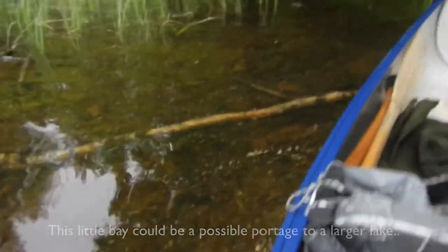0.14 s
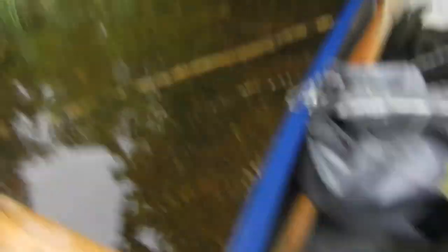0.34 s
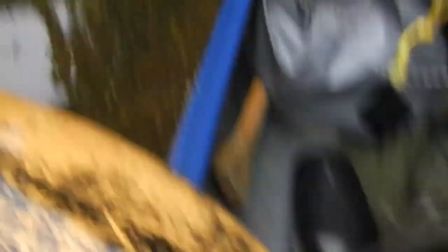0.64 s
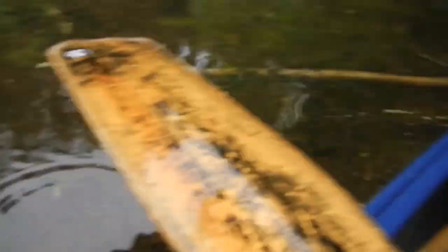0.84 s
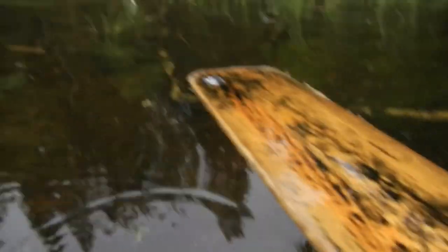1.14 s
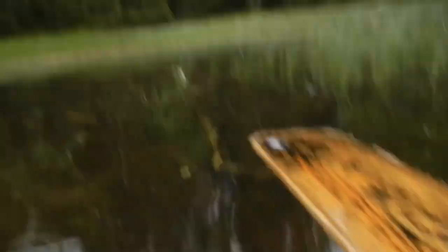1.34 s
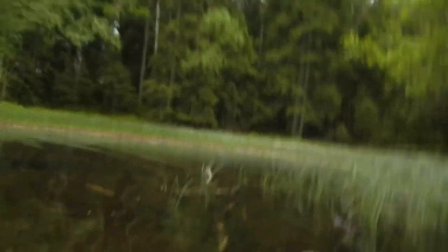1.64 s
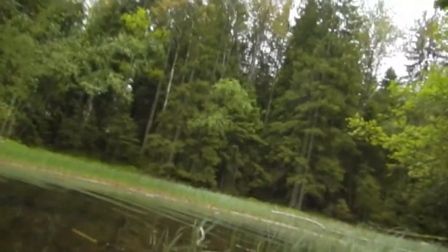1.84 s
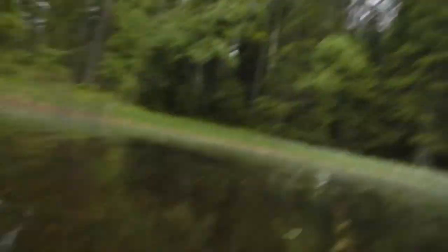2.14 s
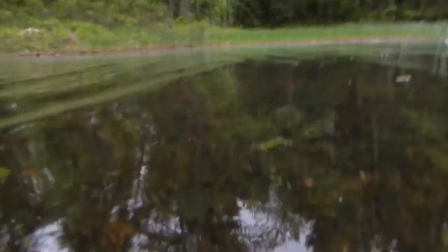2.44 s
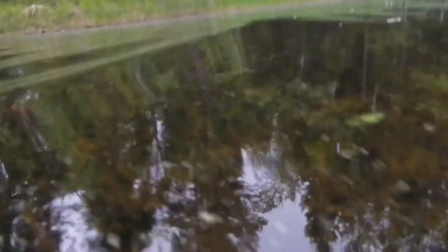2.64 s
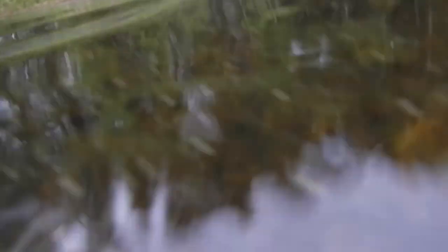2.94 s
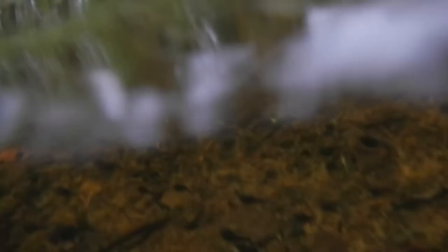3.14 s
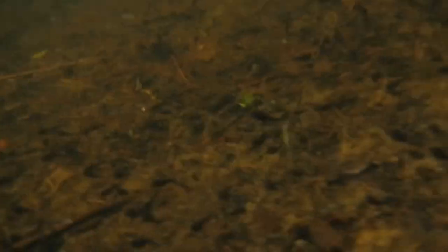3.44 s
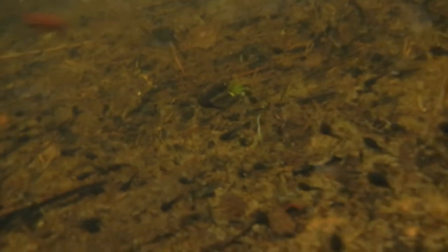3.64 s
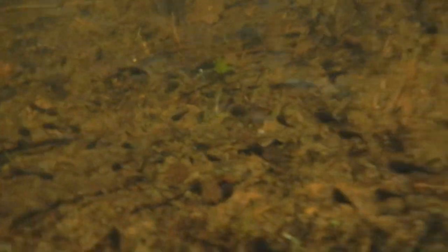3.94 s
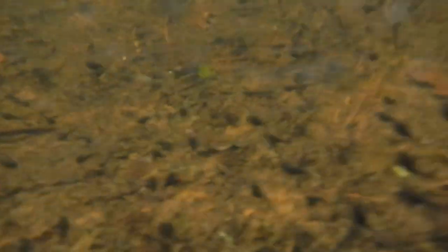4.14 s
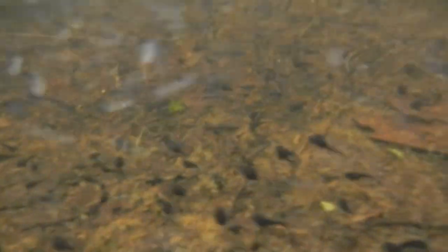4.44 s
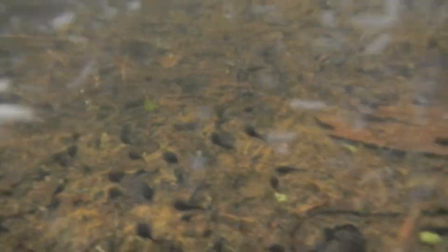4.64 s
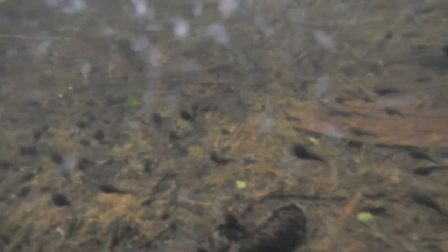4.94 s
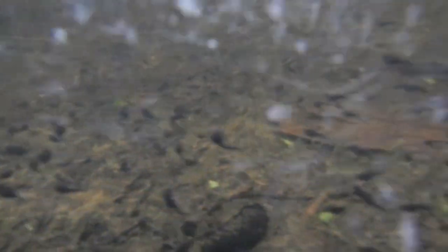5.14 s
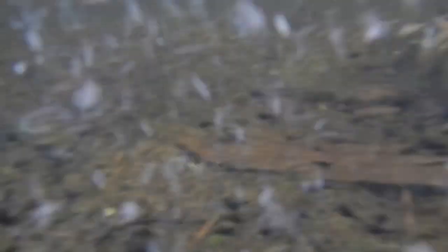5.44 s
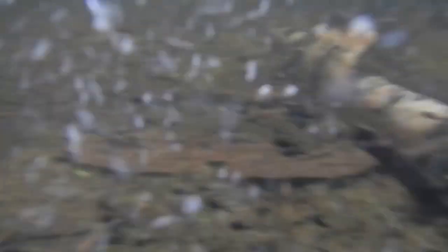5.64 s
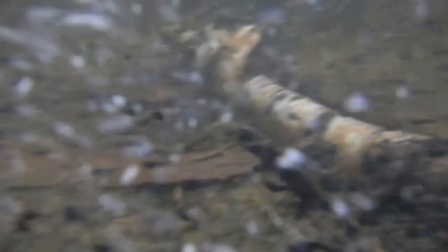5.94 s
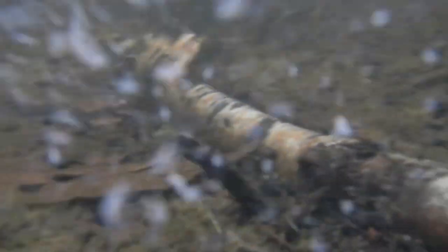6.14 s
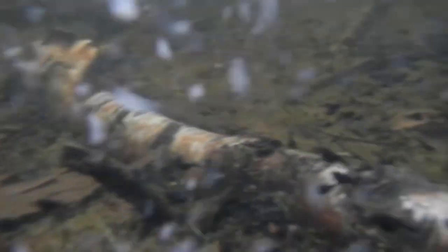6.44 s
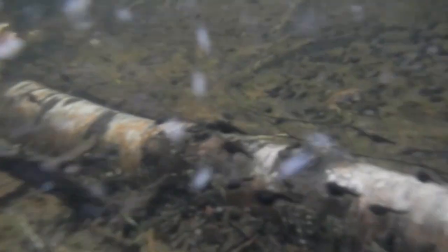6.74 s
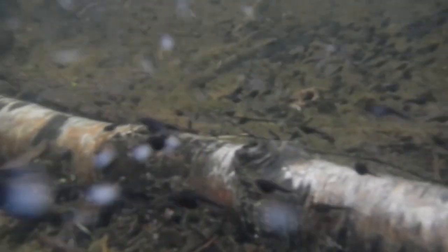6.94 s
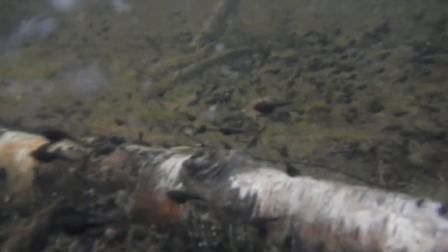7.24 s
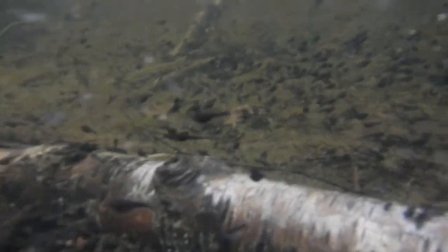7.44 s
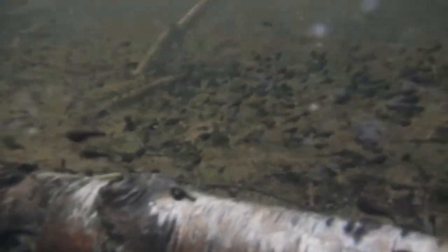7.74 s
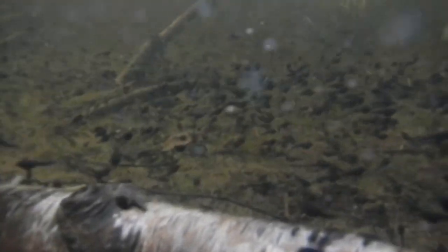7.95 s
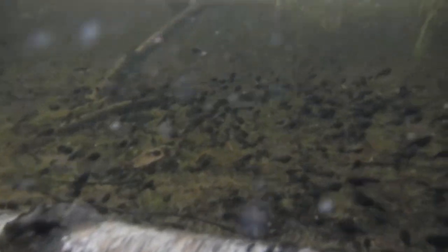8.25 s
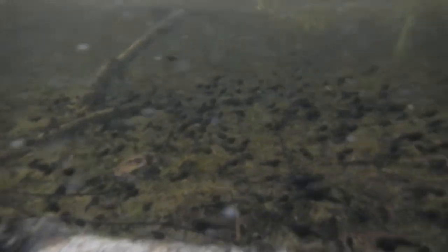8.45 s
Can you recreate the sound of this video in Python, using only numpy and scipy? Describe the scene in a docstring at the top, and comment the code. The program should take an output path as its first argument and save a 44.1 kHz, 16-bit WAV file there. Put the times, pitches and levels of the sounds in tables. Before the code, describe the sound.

Nylon sleeve swishes and gear knocks in a canoe, drops tick, then water closes over the microphones with glugs, pops and low gurgling rumble.

```python
"""Air trapped in the two microphone ports of a waterproof camera glugs, pops and rings under water.
Place: the side of a canoe on a shallow lake; the sources touch the housing or lie close to it.
First, in air, a nylon sleeve swishes, snaps and taps, gear knocks, the grip creaks and drops tick.
Then the surface closes over the ports, and resonant flow noise, free bubbles and a low rumble follow.
Sleeve and water are shaped noise; pockets, bubbles and drops are decaying sines; bodies are filters."""
import sys
import numpy as np
from scipy import signal
from scipy.fft import rfft, irfft, next_fast_len
from scipy.io import wavfile
from scipy.ndimage import uniform_filter1d, map_coordinates

SR = 44100
rng = np.random.default_rng(int(sys.argv[2]) if len(sys.argv) > 2 else 0)


def wav_record(signal):
    """Record a signal, one row per channel, as 16-bit PCM in the file named by sys.argv[1]."""
    frames = np.transpose(np.atleast_2d(signal))
    bounded = np.clip(frames, -1, 1)
    # unit amplitude maps onto the largest positive 16-bit level
    quanta = np.round(bounded * 32767).astype(np.int16)
    wavfile.write(sys.argv[1], SR, quanta)


N = 379701


def amp(db):
    """Linear gain of a level in dB."""
    return 10 ** (np.asarray(db) / 20)


def unit(x):
    """Scaled to rms 1."""
    return x / np.sqrt(np.mean(x ** 2) + 1e-20)


def peak(x):
    """Scaled to peak 1."""
    return x / (np.abs(x).max() + 1e-20)


def along(points, hz):
    """(Hz, value) points interpolated on a log frequency axis."""
    f, v = np.transpose(points)
    return np.interp(np.log(hz + 1), np.log(f + 1), v)


def clock():
    """The time of every sample in s."""
    return np.arange(N) / SR


def curves(rows):
    """One value per sample for each column after the time."""
    s, *cols = np.transpose(rows)
    return [np.interp(clock(), s, c) for c in cols]


def wobble(rate):
    """A smooth random curve with rate knots a second."""
    knots = rng.standard_normal(int(N * rate / SR) + 4)
    return map_coordinates(knots, [np.arange(N) * rate / SR])


def impulse(spectrum, size=4096):
    """The causal, minimum-phase response that has this spectrum."""
    cepstrum = irfft(np.log(amp(along(spectrum, np.fft.rfftfreq(size, 1 / SR)))))
    # folding the cepstrum forward puts all the energy after the hit
    cepstrum[1:size // 2] *= 2
    cepstrum[size // 2 + 1:] = 0
    return irfft(np.exp(rfft(cepstrum)))


def colour(x, spectrum):
    """x sounded through a body with this spectrum."""
    return signal.fftconvolve(np.atleast_2d(x), impulse(spectrum)[None], axes=1)[:, :x.shape[-1]]


def lowpass(x, order, hz):
    """x with its treble rolled off above hz."""
    return signal.sosfilt(signal.butter(order, hz, fs=SR, output="sos"), x)


def pair(alike, size=N):
    """White stereo noise whose channels share a part."""
    share = np.clip(alike, 0, 1)
    common = np.sqrt(share) * rng.standard_normal(size)
    return common + np.sqrt(1 - share) * rng.standard_normal((2, size))


def place(pan_db):
    """Left and right gains of constant power; positive leans left."""
    g = amp(np.array([pan_db, -pan_db]).reshape(2, -1) / 2)
    return g / np.sqrt(np.mean(g ** 2, axis=0))


def add(track, s, sound):
    """Mix a sound in at time s."""
    i = int(np.clip(round(s * SR), 0, N - 1))
    track[:, i:i + sound.shape[-1]] += sound[..., :N - i]


def swell(s, rise, fall):
    """A smooth Gaussian movement that peaks at 1 at time s."""
    t = clock() - s
    return np.exp(-.5 * np.minimum((t / np.where(t < 0, rise, fall)) ** 2, 100))


def swells(rows, rest):
    """Gain of (s, rise s, fall s, dB) movements, added in power to a resting gain."""
    power = sum((amp(db) * swell(s, rise, fall)) ** 2 for s, rise, fall, db in rows)
    return np.sqrt(rest ** 2 + power)


def ring(t, hz, cycles, rise, glide):
    """A resonance swells in rise cycles, dies by 1/e in cycles, and creeps up in pitch when glide > 0."""
    turns = hz * t
    phase = turns * (1 + glide * (1 - np.exp(-turns / 10)))
    envelope = np.exp(-turns / cycles) * (1 - np.exp(-(turns / rise) ** 2))
    return peak(np.sin(2 * np.pi * phase) * envelope)


def gurgle(rate, spread_db, smooth_db):
    """Countless tiny bubbles, as clustered random impulses, on a bed of turbulence."""
    births = rng.random(N) < rate / SR * amp(4 * wobble(14))
    sizes = amp(spread_db * np.minimum(rng.exponential(size=N), 3)) * rng.choice([-1, 1], N)
    return unit(births * sizes) + amp(smooth_db) * rng.standard_normal(N)


def in_air():
    """1 until the water covers the ports, then 0."""
    return np.interp(clock(), [3.11, 3.15], [1, 0])


# pockets of air break away from the ports, before port tuning and trims:
# time_s, glug_level_db, glug_pitch_hz, ring_cycles, left_over_right_db, pop_level_db, snap_level_db
ESCAPING_POCKETS = [(3.1316, -2.5, 280, 1.9, -19.5, 2.5, -5.5), (3.243, -8.5, 304, 0.69, -1.5, -4.5, -9),
                    (3.3331, -17.5, 265, 1.6, -6, -31, -42), (3.5086, -15.5, 251, 1.13, 6, -18, -38),
                    (3.695, -9.5, 206, 1.1, 17, -20.5, -30), (3.7802, -12.5, 236, 1.37, 14.5, -15, -26),
                    (3.8733, -10, 227, 1.7, 11, -13, -24.5), (3.889, -11.5, 209, 2.5, 41, -40, -57.5),
                    (3.937, -10.5, 240, 0.9, 12, -10, -28.5), (4.001, -11.5, 280, 1.3, -18, -16.5, -37.5),
                    (4.031, -8, 233, 1.55, 10, -7.5, -28), (4.0905, -13.5, 225, 1.65, 12.5, -9, -29),
                    (4.157, -13.5, 234, 1.4, 13.5, -8, -23.5), (4.251, -9.5, 234, 2.3, 8, -2, -17.5),
                    (4.332, -10, 202, 1.7, 26, -38, -54), (4.3732, -10, 233, 2.4, 13, -6, -22),
                    (4.381, -8.5, 189, 1.4, 22.5, -3.5, -14.5), (4.599, -7, 201.1, 0.98, 6.5, -7, -18.5),
                    (4.679, -6.5, 196, 1.1, 14, -11.5, -51), (4.739, -7, 210, 1.2, 0, -7, -17.5),
                    (4.7857, -8, 194, 1.7, 2.5, -32, -44), (5.0073, -6, 212, 0.93, 11.5, -2, -25),
                    (5.431, -5.5, 258.9, 0.84, 0, -5.5, -30), (5.559, -15, 232.7, 1.455, 6, -35, -49),
                    (6.3862, -7, 201, 1.2, -7, -9, -23.5), (6.3927, -9.5, 220, 0.75, 2, -10, -41.5),
                    (6.8007, -15, 271, 2.3, -22, -5, -17), (6.8266, -16, 282, 1.5, -22, -18, -52),
                    (7.544, -4, 299, 3.17, -13, -10, -30), (8.423, -0.5, 276, 0.5, -5.5, -7, -31)]
GLUG_LAG_S = 0.00064  # the glug follows its pop
POP_HZ, POP_SCATTER = 929, 0.05  # the ports' upper resonance; log spread from pop to pop
POP_CYCLES, POP_GLIDE = 2.3, 0.028  # ring of a pop; pitch creep for each cycle of ring
POP_PAN_FOLLOWS, POP_PAN_DB = .45, -5.5  # a pop leans with its glug, plus a fixed lean


def glugs():
    """Each escaping pocket pops as it pinches off, and the air left behind glugs."""
    out = np.zeros((2, N))
    for s, db, hz, cycles, pan_db, pop_db, snap_db in ESCAPING_POCKETS:
        add(out, s + GLUG_LAG_S, glug(db, hz, cycles, pan_db))
        pop_hz = POP_HZ * np.exp(POP_SCATTER * rng.standard_normal())
        pop_pan_db = POP_PAN_FOLLOWS * pan_db + POP_PAN_DB
        add(out, s, pop(pop_db, pop_hz, POP_CYCLES, pop_pan_db, snap_db))
    return out


def glug(db, hz, cycles, pan_db):
    """The air in the ports rings a few cycles; the right port holds less and rings higher."""
    t = np.arange(SR // 8) / SR
    left = ring(t, hz * 0.863, cycles, rise=0.38, glide=0.038)
    right = ring(t, hz * 1.15, cycles * 0.62, rise=0.26, glide=0.029)
    return amp(db - 0.5) * place(pan_db) * np.array([left, right])


# the housing as a sharp snap or a rattle excites it: frequency_hz, level_db
HOUSING_SNAP = [(500, -18.5), (1300, -2.5), (1750, 7), (2400, -7), (3100, -10), (4200, -21.5), (9000, -45)]
PORT_DELAY_S, SNAP_LAG_S = 0.00029, 0.00013  # the right port rings, and gets the snap, this much later
OVERTONE_HZ, OVERTONE_DB = 1670, -7.5  # the housing's ring after a snap
SPATTER_DB, SPATTER_T60_S = -12, 0.026  # tiny bubbles torn off by a snap


def pop(db, hz, cycles, pan_db, snap_db):
    """A bursting bubble snaps and spatters through the housing, and rings each port at its own pitch."""
    click = peak(impulse(HOUSING_SNAP))
    t = np.arange(len(click)) / SR
    overtone = ring(t, OVERTONE_HZ, cycles=3.3, rise=0.23, glide=0.02)
    snap = amp(-3.0) * click + amp(OVERTONE_DB) * overtone
    snaps = np.array([snap, np.interp(t - SNAP_LAG_S, t, snap, left=0)])
    spatter = unit(colour(pair(alike=0.27, size=len(t)), HOUSING_SNAP))
    snaps += amp(SPATTER_DB - 60 * t / SPATTER_T60_S) * spatter
    glide = POP_GLIDE * cycles
    left = ring(t, hz, cycles, rise=0.73, glide=glide)
    right_t = np.maximum(t - PORT_DELAY_S, 0)
    right = ring(right_t, hz * 0.897, cycles * 0.65, rise=0.58, glide=glide)
    return place(pan_db) * (amp(db) * np.array([left, right]) + amp(snap_db - 0.5) * snaps)


# free bubbles ring close to the ports, before port tuning: time_s, level_db, pitch_hz, left_over_right_db
FREE_BUBBLES = [(3.354, -18, 1075, 6.5), (4.196, -14.5, 870, 10), (4.214, -4, 870, 6.5),
                (4.2587, -5.5, 890, 9), (4.281, -29, 1800, -3), (4.3928, -5, 984, 30.5),
                (4.412, -6, 814, 2.5), (4.5573, -8, 930, 14.5), (4.6588, -6.5, 900, 9.5),
                (4.8254, -11, 865, 2.5), (5.131, -16, 1000, 5), (5.154, -14, 850, -11),
                (5.259, -35, 1710, -2), (5.68, -9.5, 960, 12), (5.71, -11, 887, 10),
                (6.182, -12.5, 1397, 10), (7.3782, -7.5, 930, -16.5), (8.2919, -7, 1050, 2)]
PLIP_CYCLES, PLIP_CYCLES_GROW = 2.13, 1.7  # ring at POP_HZ; power by which it lengthens with pitch
PLIP_SNAP_DB = -30  # a free bubble hardly snaps


def plips():
    """A free bubble is a pop with no glug."""
    out = np.zeros((2, N))
    for s, db, hz, pan_db in FREE_BUBBLES:
        cycles = PLIP_CYCLES * (hz / POP_HZ) ** PLIP_CYCLES_GROW
        add(out, s, pop(db, hz, cycles, pan_db, db + PLIP_SNAP_DB))
    return out


# soft pushes on the ports, by the hand or by eddies, before port tuning and trim:
# time_s, level_db, pitch_hz, left_over_right_db
SOFT_PUSHES = [(0.505, -19, 121, -26), (1.956, -20.5, 114, 1), (2.101, -16.5, 170, 24),
               (2.218, -14.5, 130, 2), (2.645, -18.5, 190, -7), (2.88, -16.5, 155, -37.5),
               (7.337, -15.5, 198.4, 16), (7.52, -9.5, 170, -1.5), (7.602, -12.5, 131.4, 10),
               (7.683, -14, 140, 5.5), (7.785, -9, 111.5, 10), (8.004, -7, 263, 8), (8.402, -7.5, 125, 7)]


def thumps():
    """A soft push rings the ports low, with no pop."""
    out = np.zeros((2, N))
    for s, db, hz, pan_db in SOFT_PUSHES:
        add(out, s, glug(db, hz, cycles=1.55, pan_db=pan_db))
    return out


# wavelets slap the ports shut, each falling in pitch: time_s, peak_db, first_pitch_hz, last_pitch_hz
WAVELET_SLAPS = [(3.054, -15, 1590, 652), (3.0729, -5.5, 2050, 480), (3.0933, -7.5, 1900, 400),
                 (3.1068, -5, 1150, 203), (3.1175, -11, 1990, 478)]
SLAP_FALL_S, SLAP_RISE_S, SLAP_DECAY_S = 0.0011, 0.00039, 0.005  # the pitch's fall; the swell; the fade


def slaps():
    """Water loads the open ports, so each slap rings for a few cycles and drops in pitch, alike in both."""
    out, t = np.zeros((2, N)), np.arange(SR // 40) / SR
    shape = (1 - np.exp(-t / SLAP_RISE_S)) * np.exp(-(t / SLAP_DECAY_S) ** 2)
    for s, db, first_hz, last_hz in WAVELET_SLAPS:
        extra_turns = (first_hz - last_hz) * SLAP_FALL_S * (1 - np.exp(-t / SLAP_FALL_S))
        turns = last_hz * t + extra_turns
        add(out, s, amp(db) * peak(shape * np.sin(2 * np.pi * turns)))
    return out


# the surface closes over the housing: time_s, rush_level_db
PLUNGE_RUSH = [(2.8, -86), (2.89, -36), (3.02, -31), (3.055, -21), (3.125, -18), (3.145, -25.5),
               (3.18, -50), (3.2, -80)]
# broken water over the whole housing: frequency_hz, level_db
WASH_SPECTRUM = [(25, 1.5), (100, 7), (300, 2.5), (650, 5), (1100, 2.5), (1700, -10), (3000, -21),
                 (14000, -66.5)]


def plunge():
    """Water churns and crackles over the housing as it goes down."""
    rush_db, = curves(PLUNGE_RUSH)
    spatter = gurgle(rate=1800, spread_db=6.0, smooth_db=-6) + amp(-8.5) * pair(alike=0)
    return amp(rush_db) * unit(colour(spatter, WASH_SPECTRUM))


# shoves of the housing; some build up and stop short, others start abruptly and fade:
# peak_time_s, rise_s, fall_s (Gaussian widths), gurgle_level_db, churn_level_db
HOUSING_SHOVES = [(3.265, .012, 0.024, -37.5, -33), (4.204, 0.011, .022, -33, -35),
                  (4.47, 0.023, 0.041, -32.5, -45), (5.391, 0.068, 0.029, -30, -37.5),
                  (5.712, .005, 0.024, -25.5, -34), (5.863, 0.0033, 0.062, -30.5, -29),
                  (6.68, 0.061, 0.11, -31.5, -41), (7.495, 0.044, 0.035, -27.5, -26.5),
                  (8.41, 0.44, 0.016, -24.5, -43), (8.415, .016, 0.011, -34, -22.5)]
TREBLE_HZ = 1390  # where the treble of moving water begins


def churn():
    """A shove breaks the water over the whole housing in a broad, grainy swish."""
    level = swells([(s, rise, fall, db) for s, rise, fall, _, db in HOUSING_SHOVES], 0)
    grains = np.array([gurgle(rate=600, spread_db=5.5, smooth_db=-13) for _ in range(3)])
    swish = colour(grains[:2] + grains[2], WASH_SPECTRUM)
    return level * unit(lowpass(swish, 1, TREBLE_HZ))


# steady water moving past the ports, before the gurgle gain: time_s, level_db
STEADY_FLOW = [(3.18, -38), (3.75, -46), (4.08, -40), (4.42, -41), (4.69, -33), (5.11, -38.5),
               (5.76, -40.5), (6.24, -34.5), (6.87, -38), (7.01, -36.5), (7.32, -30), (7.62, -33.5),
               (8.0, -31), (8.27, -33.5), (8.45, -35), (8.6, -36)]
GURGLE_DB = 4.5  # gain over the steady flow
STIR_DB, STIR_RISE_S, STIR_FALL_S = -26.5, 0.02, 0.006  # swirl around each escaping pocket, re its glug


def flow_level():
    """Level in dB of the water's motion: steady flow, shoves and swirls add in power."""
    steady_db, = curves(STEADY_FLOW)
    shoves = [row[:-1] for row in HOUSING_SHOVES]
    swirls = [(s, STIR_RISE_S, STIR_FALL_S, db + STIR_DB) for s, db, *_ in ESCAPING_POCKETS]
    return 20 * np.log10(swells(shoves + swirls, amp(steady_db + GURGLE_DB)))


# the air trapped in the ports: time_s, left_over_right_db, pitch_factor
TRAPPED_AIR = [(3.2, -4, 1.12), (3.6, -0.5, 0.99), (6.4, 3.5, 1), (7.3, -2, 1.02), (7.7, 5.5, 1.033)]
# resonances of the flooded left port: frequency_hz, level_db
LEFT_RESONANCES = [(50, -17), (130, 2), (200, 6), (320, -9.5), (550, -20), (780, -8), (900, 1), (1060, 2),
                   (1300, -19.5), (1700, -15), (2050, -33), (2600, -40), (3100, -31), (4200, -61),
                   (8000, -80)]
# resonances of the flooded right port: frequency_hz, level_db
RIGHT_RESONANCES = [(55, -15.5), (180, -3), (310, 1.5), (580, -7), (880, 3), (1110, -7.5), (1400, -20),
                    (1800, -25), (2550, -43), (3200, -36), (4400, -56), (9000, -86)]
CROSS_FLOW_DB = -6.5  # water crossing the housing presses one port and draws on the other
WANDER, WANDER_RATE = .02, 14  # share by which the ports' pitch wanders; knots per s
TREBLE_DB, TREBLE_GROWS = 3, 0.4  # treble gain in fast flow; dB gained per dB of flow


def flooded_ports(flow_db, speed_db):
    """Each port colours the turbulence with its own resonances; slow water leaves the upper ones quiet."""
    pan_db, tuning = curves(TRAPPED_AIR)
    stir = np.array([gurgle(rate=300, spread_db=2.5, smooth_db=-9.5) for _ in range(3)])
    drives = stir[:2] + amp(CROSS_FLOW_DB) * np.array([stir[2], -stir[2]])
    bodies = (LEFT_RESONANCES, RIGHT_RESONANCES)
    ports = [unit(colour(drive, body))[0] for drive, body in zip(drives, bodies)]
    # the resonances drift as the trapped air changes in size
    drifted = []
    for port in ports:
        position = np.cumsum(tuning + WANDER * wobble(WANDER_RATE))
        drifted.append(map_coordinates(port, [position], mode="mirror"))
    drifted = np.array(drifted)
    low = signal.sosfiltfilt(signal.butter(2, TREBLE_HZ, fs=SR, output="sos"), drifted)
    sound = low + amp(TREBLE_DB + TREBLE_GROWS * speed_db) * (drifted - low)
    return amp(flow_db + 2.14 * wobble(20)) * sound * place(pan_db)


CLOUD_DB, CLOUD_S = 9, .5  # the cloud of bubbles dragged down by the plunge, and its 1/e life


def bubble_cloud(flow_db):
    """Single bubbles stand out most in slow water, and around the end of the plunge."""
    cloud_db = CLOUD_DB * np.exp(-np.abs(clock() - PLUNGE_RUSH[-1][0]) / CLOUD_S)
    return amp(0.56 * flow_db - 24.0 + cloud_db) * bubbles(count=900, hz=697, spread=.4, size_db=8)


def bubbles(count, hz, spread, size_db):
    """Free bubbles of many sizes, each a short rising note nearer to one port."""
    out, t = np.zeros((2, N)), np.arange(SR // 25) / SR
    times = rng.uniform(0, N / SR, count)
    traits = np.clip(rng.standard_normal((count, 3)), -2, 2)
    for s, (pitch, size, side) in zip(times, traits):
        note = ring(t, hz * np.exp(spread * pitch), cycles=1.9, rise=0.46, glide=0.14)
        add(out, s, amp(size_db * size) * place(7 * side) * note)
    return unit(out)


# the housing pushes water, before the rumble gain: time_s, rumble_level_db
HOUSING_SWAY = [(3.18, -29), (3.38, -59), (4.27, -36), (5.58, -42), (6.21, -32.5), (6.97, -45.5),
                (7.44, -32), (8.42, -26), (8.48, -33)]
# low noise of the pushed water: frequency_hz, level_db
RUMBLE_SPECTRUM = [(12, -1), (42, 8), (95, 3), (160, -1.5), (260, -16), (600, -67)]


def rumble():
    """The moving housing pushes water in low, unsteady noise, nearly alike in both ports."""
    rumble_db, = curves(HOUSING_SWAY)
    noise = unit(colour(amp(2.4 * wobble(22)) * pair(alike=0.9), RUMBLE_SPECTRUM))
    return amp(rumble_db + 2.5) * noise * place(1.6)


# levels when the flow is fast, before the fizz; each grows by so many dB per dB of flow
RATTLE_DB, RATTLE_GROWS = -45.5, 1.05


def rattle(speed_db, fizz_db):
    """Fast water rattles the housing itself."""
    noise = unit(colour(amp(2.4 * wobble(200)) * pair(alike=0.081), HOUSING_SNAP))
    return amp(RATTLE_DB + RATTLE_GROWS * speed_db + fizz_db) * noise * place(3.5)


# bright spray noise: frequency_hz, level_db
SPRAY_SPECTRUM = [(1500, -16.5), (3300, -4), (5000, -0.5), (9000, -2), (13300, -5.5), (14500, -22.5)]
SPRAY_DB, SPRAY_GROWS, SPRAY_BUILD_S = -61, 3.7, 0.38


def spray(speed_db, fizz_db):
    """Only a lasting flow raises spray, so its speed is averaged and then steeply expanded."""
    lasting_db = uniform_filter1d(speed_db, int(SPRAY_BUILD_S * SR))
    noise = unit(colour(amp(3.1 * wobble(330)) * pair(alike=0.073), SPRAY_SPECTRUM))
    return amp(SPRAY_DB + SPRAY_GROWS * lasting_db + fizz_db) * noise


# share of fine fizz in the flow: time_s, level_db
FIZZ_SHARE = [(3.6, -4), (4.0, 6), (5.1, -8.5), (6.2, 2), (6.95, -1.5), (8.0, 3)]
FAST_FLOW_DB = -22.5  # flow level at which the treble, rattle and spray levels hold


def underwater():
    """The flow stirs the air in each port, sheds bubbles and raises rattle and spray, over the rumble."""
    flow_db = flow_level()
    speed_db = flow_db - FAST_FLOW_DB
    fizz_db, = curves(FIZZ_SHARE)
    out = flooded_ports(flow_db, speed_db) + bubble_cloud(flow_db) + rumble()
    out += rattle(speed_db, fizz_db) + spray(speed_db, fizz_db)
    return out * (1 - in_air())


# a loose air pocket at the right port swells, then shrinks: time_s, pitch_hz, level_db
LOOSE_AIR = [(5.15, 772, -62), (5.36, 687, -40.5), (6.05, 478, -45.5), (6.7, 659, -45), (7.1, 699, -37),
             (7.52, 804, -29.5), (7.58, 810, -77)]


def loose_pocket(width_hz):
    """Soft eddies push on a loose pocket of air, whose burbling note follows its size."""
    hz, db = curves(LOOSE_AIR)
    turn = np.exp(2j * np.pi * np.cumsum(hz) / SR)
    eddies = lowpass(gurgle(rate=150, spread_db=2.5, smooth_db=-9), 2, POP_HZ)
    # shift the moving pitch to zero, resonate there, and shift back
    pole = np.exp(-np.pi * width_hz / SR)
    note = (signal.lfilter([1], [1, -pole], eddies / turn) * turn).imag
    return amp(db) * unit(note) * place(-16)


# sharp ticks of water on the housing: time_s, peak_db
WATER_TICKS = [(3.13, -16), (3.241, -32), (3.354, -50.5), (4.033, -37), (4.229, -42.5), (4.677, -41),
               (4.74, -36.5), (5.01, -38), (5.431, -37.5), (6.075, -42.5), (6.388, -38.5), (6.802, -35.5),
               (7.545, -42), (8.2914, -34), (8.424, -33)]
# a small, bright click: frequency_hz, level_db
CLICK_SPECTRUM = [(1000, -20), (5000, 2), (8000, -9.5), (15000, -19)]


def ticks():
    """Tiny bright impacts, with almost no ring."""
    out, click = np.zeros((2, N)), peak(impulse(CLICK_SPECTRUM))
    for s, db in WATER_TICKS:
        add(out, s, amp(db) * click)
    return out


# strokes of the nylon sleeve, with a few brief snaps and taps:
# peak_time_s, rise_s, fall_s (Gaussian widths), hiss_level_db, rub_level_db
SLEEVE_MOVES = [(0.16, 0.08, 0.063, -35, -38.5), (.23, 0.054, 0.048, -37, -36),
                (0.2951, 0.0018, 0.0029, -21.5, -20.5), (.325, 0.011, 0.019, -53, -35),
                (.44, 0.02, 0.04, -62, -45), (.509, 0.01, 0.0094, -35, -25), (.72, 0.046, 0.038, -38, -43),
                (0.766, 0.022, 0.027, -28.5, -32), (.853, 0.0026, 0.0046, -55, -34.5),
                (.92, 0.051, 0.021, -41, -47.5), (1.05, 0.071, 0.033, -35, -39.5),
                (1.2, 0.34, 0.47, -43, -42), (1.3, 0.017, 0.034, -32, -35), (1.55, 0.33, 0.35, -46, -44.5),
                (1.7, 0.024, 0.027, -35.5, -51.5), (1.789, 0.018, 0.018, -23.5, -34),
                (1.894, 0.0065, 0.005, -20.5, -28), (2.125, 0.065, 0.03, -46.5, -34.5),
                (2.27, 0.15, 0.14, -42.5, -40.5), (2.481, 0.062, 0.024, -32.5, -35),
                (2.61, 0.047, 0.093, -40, -45.5), (2.95, 0.25, 0.27, -43, -39.5)]
# bright hiss of the nylon: frequency_hz, level_db
HISS_SPECTRUM = [(1500, -39.5), (3000, -4), (4700, -9), (6000, -1), (7500, -4.5), (9500, -0.5),
                 (12000, -5.5), (14200, -5.5), (15500, -30.5)]
# duller rub of the cloth: frequency_hz, level_db
CLOTH_SPECTRUM = [(100, -11.5), (250, -9.5), (520, -1), (750, -10), (1300, -10.5), (2200, -5.5),
                  (5000, -20.5), (10000, -55)]
SLEEVE_REST_DB, RUB_REST_DB = -53, -50.5  # the sleeve never lies quite still
# the hand shifts its hold: peak_time_s, rise_s, fall_s (Gaussian widths), rumble_level_db
HAND_SHIFTS = [(.515, 0.015, 0.0046, -26), (2.0, 0.19, 0.35, -34), (3.12, 0.06, .035, -26)]
# low rumble of the hand on the housing: frequency_hz, level_db
HANDLING_SPECTRUM = [(15, -17), (40, 2.5), (100, -1.5), (190, -6), (350, -18), (900, -54.5)]
HOLD_DB = -49.5  # rumble of the resting hand


def sleeve():
    """Nylon strokes and a few brief snaps and taps, each a hiss over a duller rub; the hand rumbles below."""
    hiss_gain = swells([(s, rise, fall, db) for s, rise, fall, db, _ in SLEEVE_MOVES], amp(SLEEVE_REST_DB))
    rub_gain = swells([(s, rise, fall, db) for s, rise, fall, _, db in SLEEVE_MOVES], amp(RUB_REST_DB))
    weave = amp(1.5 * wobble(500) + 1.8 * wobble(40.14))
    hiss = unit(colour(weave * pair(alike=0.16), HISS_SPECTRUM))
    rub = unit(colour(weave * pair(alike=0.32), CLOTH_SPECTRUM))
    hand = unit(colour(amp(5.0 * wobble(25.02)) * pair(alike=0.35), HANDLING_SPECTRUM))
    out = hiss_gain * shaded(hiss, hz=5900) * place(2.1)
    out += rub_gain * rub
    out += swells(HAND_SHIFTS, amp(HOLD_DB)) * hand
    return out * in_air()


# the hand covers the ports: time_s, share_dulled (0 to 1)
HAND_COVER = [(1.91, 0), (1.94, 1), (2.5, 0.6), (3.0, 1)]


def shaded(x, hz):
    """A hand over the ports takes the top off the hiss."""
    cover = np.clip(curves(HAND_COVER)[0], 0, 1)
    return x + cover * (lowpass(x, 1, hz) - x)


# knocks on the hull, before the body gain and decay factors: time_s, level_db, crack_level_db, t60_s
HULL_KNOCKS = [(.196, -33, -45, .05), (0.508, -22.5, -28.5, 0.026), (0.772, -29.5, -40.5, 0.037),
               (1.137, -25, -26, 0.029), (1.358, -20, -7.5, 0.16)]
# the hull's dense ring: frequency_hz, level_db
HULL_SPECTRUM = [(40, -51), (110, 3), (260, -2.5), (450, 1), (750, -4.5), (1100, -1.5), (1600, -14.5),
                 (2400, -10.5), (4000, -15), (10000, -47)]


def knocks():
    """A crack, then the hull's dense ring, whose treble dies first and leaves a low hum."""
    out, t = np.zeros((2, N)), np.arange(SR // 3) / SR
    crack_spectrum = [(300, -9.0), (3000, 2.5), (14000, -9)]  # Hz, dB
    for s, db, crack_db, t60 in HULL_KNOCKS:
        body = unit(colour(pair(alike=0.69, size=len(t)), HULL_SPECTRUM))
        low = lowpass(body, 1, 600)
        boom = low * amp(-60 * t / (t60 * 1.37)) + (body - low) * amp(-60 * t / (t60 * 0.84))
        hum = amp(-1.5) * ring(t, hz=155.0, cycles=t60 * 38, rise=0.29, glide=0)
        hum += amp(1.0) * ring(t, hz=286.0, cycles=t60 * 30, rise=0.86, glide=0)
        crack = unit(colour(pair(alike=0.38, size=len(t)), crack_spectrum)) * amp(-60 * t / 0.0063)
        add(out, s, amp(db + 6.5) * (boom + 0.37 * hum) + amp(crack_db) * crack)
    return out


# a finger skids on the housing, before panning: pitch_hz, level_db
SKID_TONES = [(1170, -23.5), (1640, -12.5), (1850, -16)]
SKID_AT_S = 1.9122


def squeak(width):
    """One short skid of unsteady tones that swells and stops; width in s."""
    t = clock() - SKID_AT_S
    envelope = np.exp(-.5 * (t / width) ** 2)
    tones = sum(amp(db) * np.sin(2 * np.pi * hz * t + 0.91 * wobble(600)) for hz, db in SKID_TONES)
    return tones * envelope * place(11)


# the grip sticks and slips, before jitter and trims: time_s, slips_per_s, level_db
GRIP_SLIPS = [(2.0, 155, -26.5), (2.025, 165, -23), (2.04, 297, -16.5), (2.07, 170, -19),
              (2.085, 106, -11.5), (2.125, 125, -9), (2.137, 222, -8), (2.156, 205, -19.5)]
# the plastic housing at the grip: frequency_hz, level_db
GRIP_SPECTRUM = [(200, -18), (550, -6), (1000, 2.5), (1500, -9), (2000, 5), (2500, 4.5), (2900, -14.5),
                 (3700, -2), (4500, -18), (7000, -21.5), (14000, -45)]
EDGE_DB, EDGE_GROWS = -4, 2.3  # the bright edge of a slip grows faster than its body


def creak():
    """Uneven slips of the grip, each a click through the plastic housing; hard slips are brighter."""
    rate, db = curves(GRIP_SLIPS)
    count = np.floor(np.cumsum(rate * amp(1.8 * wobble(160))) / SR)
    active = (clock() > GRIP_SLIPS[0][0]) * (clock() < GRIP_SLIPS[-1][0])
    slips = np.diff(count, prepend=0) * active
    sizes = slips * amp(db + 0.67 * wobble(150))
    clicks = signal.fftconvolve(sizes, peak(impulse(GRIP_SPECTRUM)))[:N]
    edges = signal.fftconvolve(sizes ** EDGE_GROWS, peak(impulse(CLICK_SPECTRUM)))[:N]
    return (amp(-0.5) * clicks + amp(EDGE_DB) * edges) * place(-1.6)


# drops and ripples tapping the housing: time_s, ring_peak_db, pitch_hz
WATER_DROPS = [(2.5504, -24, 8440), (2.564, -16, 2100), (2.579, -21.5, 5690), (2.694, -20.5, 1680),
               (2.738, -21, 1700), (2.774, -13.5, 1520), (2.8043, -16, 7180), (2.808, -16, 930),
               (2.9193, -10, 1500), (2.9786, -16, 1180), (3.0825, -18.5, 3700)]
DROP_SPATTER_DB = -7.5  # relative to its drop


def drops():
    """Each drop is a very short ring with a trace of spatter."""
    out, t = np.zeros((2, N)), np.arange(SR // 20) / SR
    for s, db, hz in WATER_DROPS:
        noise = unit(colour(pair(alike=0.36, size=len(t)), GRIP_SPECTRUM))
        spatter = noise * amp(DROP_SPATTER_DB - 60 * t / 0.015)
        note = ring(t, hz, cycles=hz * 0.00088, rise=0.12, glide=0.033)
        add(out, s, amp(db) * (note + spatter))
    return out


# the camera's electronics: time_s, level_db
WHINE_LEVEL = [(0, -63.5), (3.12, -58), (3.16, -100), (8, -68.5)]
WHINE_HZ = 14835


def whine():
    """A thin electronic tone, muffled as the ports get wet, then slowly returning."""
    whine_db, = curves(WHINE_LEVEL)
    return amp(whine_db) * np.sin(2 * np.pi * WHINE_HZ * clock())


def scene():
    """Everything as the two ports receive it."""
    below = glugs() + plips() + slaps() + plunge() + churn() + underwater()
    below += loose_pocket(width_hz=52) + ticks()
    above = sleeve() + knocks() + squeak(width=0.0029) + creak() + drops()
    return below + thumps() + above + whine()


TOP_HZ = 16000  # the camera's band limit


def record(dry):
    """The loudest peaks flatten near full scale; the camera keeps nothing above its band limit."""
    held = dry / (1 + np.abs(dry / .97) ** 8) ** (1 / 8)
    size = next_fast_len(N + SR // 2)
    padded = np.pad(held, ((0, 0), (0, size - N)), mode="reflect")
    kept = np.fft.rfftfreq(size, 1 / SR) < TOP_HZ
    return irfft(rfft(padded) * kept, size)[:, :N]


dry = scene()
out = record(dry)
wav_record(out)
```